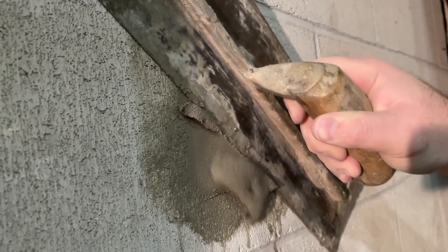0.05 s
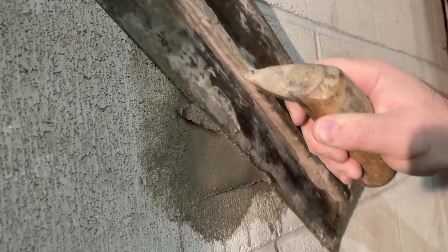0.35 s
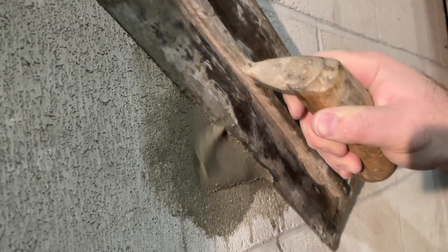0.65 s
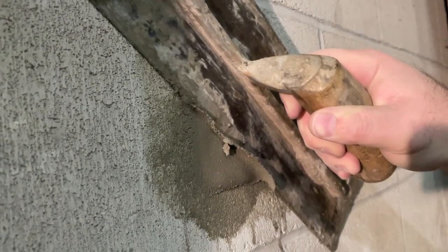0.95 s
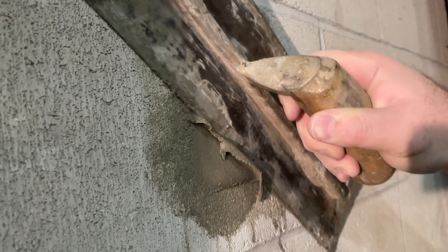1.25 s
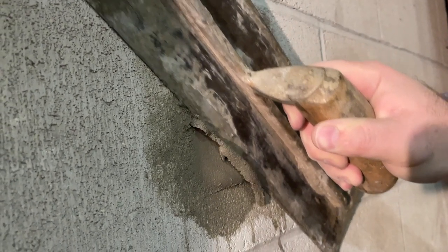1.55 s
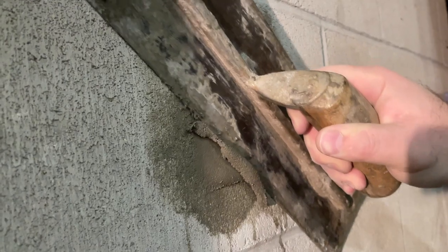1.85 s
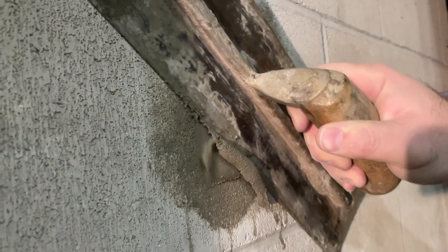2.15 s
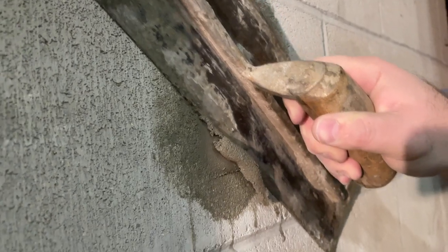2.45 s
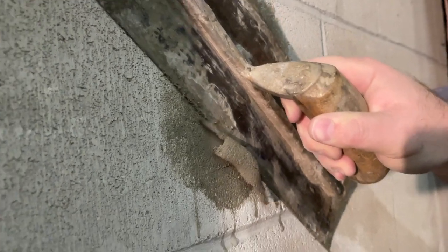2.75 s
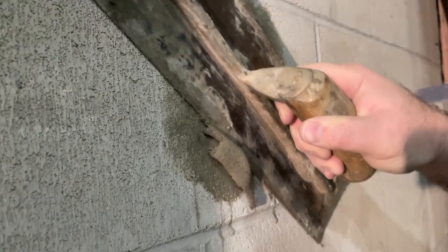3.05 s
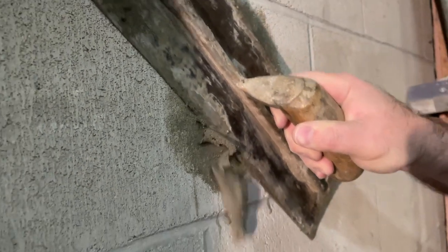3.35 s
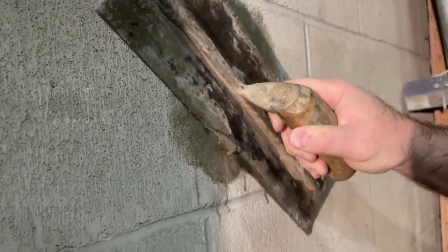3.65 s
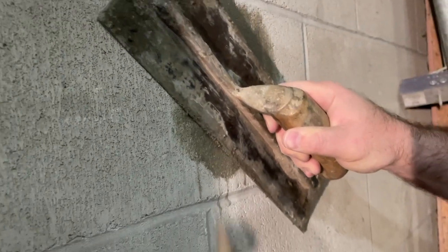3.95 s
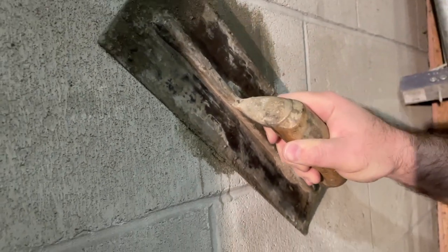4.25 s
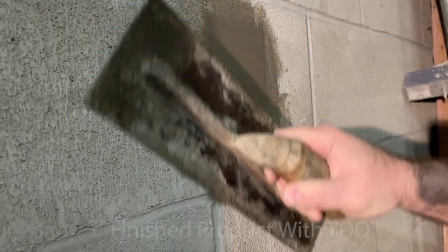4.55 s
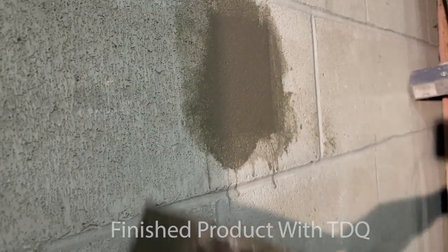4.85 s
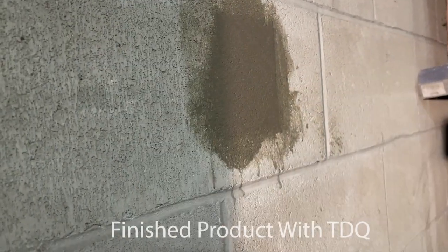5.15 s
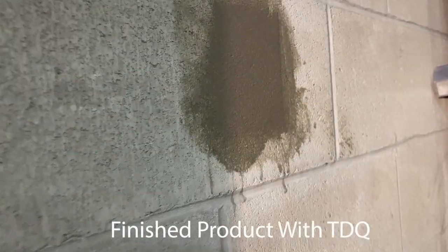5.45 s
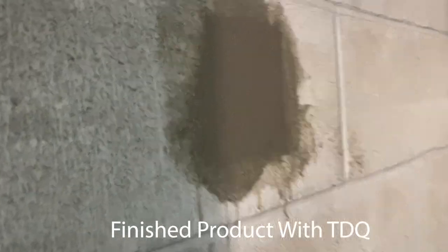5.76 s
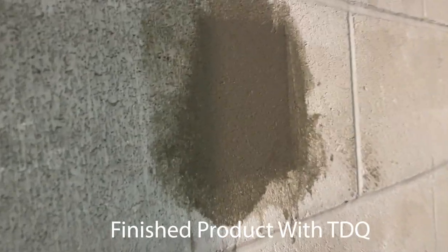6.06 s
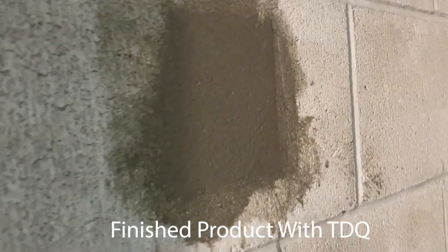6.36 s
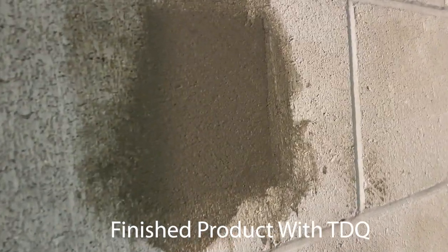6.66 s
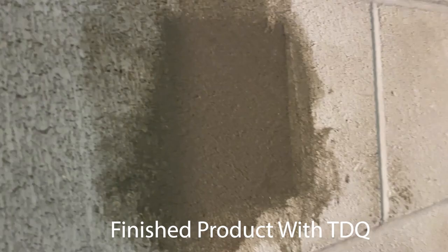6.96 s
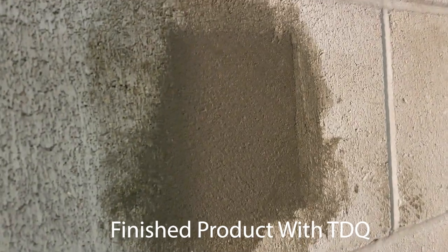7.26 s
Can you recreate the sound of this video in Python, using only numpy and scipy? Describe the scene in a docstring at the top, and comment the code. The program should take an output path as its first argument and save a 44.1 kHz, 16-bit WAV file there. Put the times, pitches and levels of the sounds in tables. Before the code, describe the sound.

Outdoors and close up, a metal trowel shaves sandy mortar from a wall in quick, even, short scrapes, with coarse grains crackling and ticking under the blade. After over four seconds the scraping ends in a longer stroke that thins and rises as the blade leaves. What is left is quiet: a low electric hum and the steady drone of a faraway engine.

```python
"""Trowel shaving mortar.

A steel trowel saws half-set mortar off a wall, close by, in about eight strokes a second. The scrape
dies at every turn, and the last stroke is a long sweep that lifts off. Stick-slip friction over sand
rings the hand-damped blade and hisses; coarse grit catches and clicks. Behind it a distant engine
pulls away, and a low electric hum and the outdoor air stay on once the trowel is lifted."""
import sys
import numpy as np
from scipy import signal
from scipy.fft import rfft, irfft, next_fast_len
from scipy.io import wavfile
from scipy.ndimage import uniform_filter1d

SR = 44100
rng = np.random.default_rng(int(sys.argv[2]) if len(sys.argv) > 2 else 0)


def unload_wav(signal):
    """Save mono or channel-first audio to the path in sys.argv[1] as 16-bit WAV at rate SR, clipped to [-1, 1]."""
    wavfile.write(
        sys.argv[1],
        SR,
        np.round(np.clip(np.atleast_2d(signal).T, -1, 1) * 32767).astype(np.int16),
    )


N = 327215
T = np.arange(N) / SR
FREQ = np.maximum(np.fft.rfftfreq(2 * next_fast_len(N // 2 + 8192), 1 / SR), 1)
TIP_S, LEAVES_S = 4.555, 4.715  # in the last sweep the blade tips onto a corner, then leaves the wall

# Strokes of the hand, each lasting until the next. Each row: start in seconds, relative levels of
# blade rasp and of sand hiss in dB, swell over the stroke in dB.
HAND_STROKES = [(-0.02, -20, -29, -19), (0.102, -21, -25.5, -11), (0.214, -19, -28.5, 13.5),
                (0.341, -22, -29, 4.5), (0.489, -21, -30.5, 13), (0.614, -23, -29.5, 1),
                (0.738, -23.5, -35, 3), (0.871, -20, -26, -8), (1.019, -23.5, -33, -1.5),
                (1.137, -21, -28, 1.5), (1.277, -16, -30.5, 6), (1.389, -24, -30, -12),
                (1.525, -20.5, -29, -3), (1.644, -22.5, -28.5, 0), (1.775, -22.5, -34, 25),
                (1.895, -23.5, -29.5, 10), (2.029, -21.5, -30.5, 12), (2.154, -23.5, -29, 0.5),
                (2.296, -23.5, -30.5, 3), (2.431, -21, -28, -8), (2.555, -22, -29, 4.5),
                (2.688, -20, -27.5, 8), (2.812, -21, -30, 9.5), (2.943, -23.5, -30, 3),
                (3.068, -20, -29, 8.5), (3.186, -23, -30, -2.5), (3.336, -21, -26.5, -6),
                (3.462, -21, -26.5, -4), (3.594, -24, -31.5, 9), (3.713, -22.5, -27, -5.5),
                (3.852, -23, -35.5, -6), (3.972, -24, -31.5, 2), (4.109, -21.5, -29.5, 18),
                (4.281, -21, -28, 3), (4.416, -16.5, -27.5, 9)]
# Modes of the steel plate. Each row: frequency at the usual grip in Hz, relative energy in dB,
# time to decay by 60 dB in seconds.
PLATE_MODES = [(778, -7, 0.056), (997, -4, 0.047), (1087.5, 1.5, 0.043), (1185, -10.5, 0.038),
               (1270, 1, 0.013), (1350, -17, 0.1), (1588, 2, 0.09), (1701, -1, 0.039), (1879, 0, 0.025),
               (1998, -5.5, 0.048), (2275, -8.5, 0.071), (2823, -11.5, 0.046), (3085, -7.5, 0.056)]


def trowel():
    """Friction noise: coarse grains drive the blade, fine ones hiss. Rows: common, left, right."""
    # The wall booms as the mortar thins. Each row: time in seconds, gain below 650 Hz in dB.
    wall_boom = [(0, -6), (.7, -11), (1.4, -9.5), (2.2, -0.5), (3.2, 0.5), (4.35, -3.5), (4.55, 0)]
    # Brightness of the sand. Each row: time in seconds, top treble relative to the rest in dB.
    fineness = [(0, 1), (1.0, -2), (2.2, 2), (2.7, 0), (3.4, 2.5), (4.5, 0.5), (4.65, -8)]
    _, blade_db, sand_db, swell_db = np.transpose(HAND_STROKES)
    on_blade = pressure(blade_db - 0.3, swell_db, attack_s=0.048, release_s=0.048, turn_db=-22.5)
    on_sand = pressure(sand_db + 1.95, swell_db, attack_s=0.046, release_s=0.048, turn_db=-24.5)
    first_touch = pressure(sand_db, swell_db * 0.27, attack_s=0.022, release_s=0.05, turn_db=-24)
    judder = stick_slip(per_s=110, fade_s=0.0032, steady=0.85) * undb(walk(350))
    coarse = np.array([grains(per_s=4500, spread_db=3.0) for _ in range(3)])
    fine = np.array([grains(per_s=18000, spread_db=3.5) for _ in range(3)]) + undb(-14.5) * coarse
    push, crack = catches(knock_db=10, crack_db=1.5, crumble_s=0.0023, shudder_db=-17, shudder_s=0.0087)
    grit_push, grit_crack = grit(on_blade, per_s=24, size_db=15, spread_db=5, crumble_s=0.0029)
    drag = even(coarse * judder, span_s=0.052) * on_blade
    drag += lows(drag, 650) * (undb(over_time(wall_boom)) - 1)
    drag[0] += push + grit_push
    rub = even(fine * judder * undb(2.1 * walk(500)), span_s=0.069) * on_sand
    rub = tilt(rub, over_time(fineness), pivot_hz=8300)
    _, sand_crackle = grit(first_touch, per_s=55, size_db=3.5, spread_db=4.5, crumble_s=0.0018)
    rub[0] += crack + undb(-18.5) * grit_crack + sand_crackle
    rasp = blade(drag, grip=1.24, wander=0.013, patchy_db=5, ring_db=-3.5)
    return rasp + lift_off(drag) + sand(rub, zing_db=-6, zing_t60=0.03)


def pressure(level_db, swell_db, attack_s, release_s, turn_db):
    """Amplitude envelope: friction noise follows the hand and sinks wherever it reverses."""
    starts, ends = stroke_spans()
    stroke = np.maximum(np.searchsorted(starts, T) - 1, 0)
    since, left = T - starts[stroke], ends[stroke] - T
    turning = np.clip(1 - since / attack_s, 0, 1) ** 2 + np.clip(1 - left / release_s, 0, 2) ** 2
    tipped = np.clip((T - TIP_S) / 0.032, 0, 1)
    swell = swell_db[stroke] * (since / (since + left) - .5) * (1 - tipped)
    db = level_db[stroke] + swell + turn_db * turning - 7 * tipped
    return uniform_filter1d(undb(db), size=200)


def stick_slip(per_s, fade_s, steady):
    """Stick-slip motion: the edge sticks, breaks free at once and relaxes, at uneven moments."""
    jumps = (rng.random(N) < per_s / SR) * rng.uniform(0.7, 0.78, N)
    return steady + ring(jumps, np.exp(-T[:SR // 20] / fade_s))


def grains(per_s, spread_db):
    """Shot noise: independent grain impacts, mostly small and a few large; rms 1."""
    size = undb(spread_db * np.minimum(rng.exponential(size=N), 3.5))
    return unit((rng.random(N) < per_s / SR) * size * rng.choice([-1, 1], N))


def catches(knock_db, crack_db, crumble_s, shudder_db, shudder_s):
    """Impulsive excitation: a coarse grain pushes the blade, cracks and leaves it shuddering."""
    # Grit caught under the edge. Each row: time in seconds, relative strength in dB, crack offset in dB.
    caught_grit = [(0.116, -20, -11), (0.149, -3, -26), (0.299, 0, -28), (0.376, -8.5, -8),
                   (0.506, -6, -12), (0.532, -1, -22), (0.631, -8, -9.5), (0.762, -16, -17),
                   (0.928, -1, -18), (0.938, 1.5, -14), (0.999, 2, -24), (1.026, -10.5, -11),
                   (1.142, -14, -10), (1.285, -9.5, -2), (1.326, -1, -27.5), (1.659, -15, -3.5),
                   (2.076, -7, -7), (2.587, -7, -17), (2.73, -5.5, -7), (2.741, -3, -8), (3.208, -12, -8),
                   (3.323, -6.5, -5), (3.479, -5, -13), (3.561, -5.5, -11), (3.721, -13, -14),
                   (3.742, -11.5, -1), (3.807, -0.5, -31), (3.819, -5.5, -6), (3.873, -3.5, -26),
                   (4.313, 3, -19), (4.376, -1.5, -28), (4.437, -5.5, -33)]
    push, crack, t = np.zeros(N), np.zeros(N), T[:SR // 16]
    for start, db, offset_db in caught_grit:
        bits, crumbs = rng.standard_normal((2, len(t)))
        i = int(start * SR)
        push[i] += undb(db + knock_db)
        push[i:i + len(t)] += undb(db + shudder_db) * crumbs * np.exp(-t / shudder_s)
        crack[i:i + len(t)] += undb(db + offset_db + crack_db) * bits * np.exp(-t / crumble_s)
    return push, crack


def grit(force, per_s, size_db, spread_db, crumble_s):
    """Brittle fracture: small grains snag at random, giving a push and a crack that scale with force."""
    push = (rng.random(N) < per_s / SR) * force * undb(size_db + spread_db * rng.uniform(-1, 1, N))
    crack = ring(push, np.exp(-T[:SR // 40] / crumble_s)) * rng.standard_normal(N)
    return push, crack


def blade(drives, grip, wander, patchy_db, ring_db):
    """Forced vibration: each stroke bends the blade anew, shifting and reweighting its resonances."""
    # Broad response of the blade on mortar. Each row: frequency at the usual grip in Hz, gain in dB.
    body_response = [(150, -38.5), (350, -24.5), (520, -18.5), (700, -14), (1000, -0.5), (1250, 1),
                     (1750, -2), (2300, -12.5), (2950, -14.5), (3400, -32.5), (6000, -41), (16000, -59)]
    # The rasp rises as less edge lies on the mortar. Each row: time in seconds, nominal centre in Hz.
    rasp_centre = [(0, 1415), (1.2, 1426), (3.2, 1444), (3.9, 1518), (4.2, 1610), (4.5, 1541)]
    usual_hz = 1447.3
    centres = over_time(rasp_centre, np.mean(stroke_spans(), axis=0))
    chances = rng.standard_normal((len(HAND_STROKES), len(PLATE_MODES) + 1))
    responses = []
    for centre, chance in zip(centres, chances):
        stretch = (centre / usual_hz) ** grip
        weights = undb(patchy_db * chance[1:]) * rng.choice([-1, 1], len(PLATE_MODES))
        response = undb(ring_db) * plate(stretch * (1 + wander * chance[0]), weights)
        body = minimum_phase([(hz * stretch, db) for hz, db in body_response])
        response[:len(body)] += body
        responses.append(response)
    return by_stroke(drives, responses)


def plate(stretch, weights):
    """Modal superposition: the plate's impulse response is a sum of damped sines; unit energy."""
    t = T[:SR // 10]
    response = np.zeros(len(t))
    for (hz, db, t60), weight in zip(PLATE_MODES, weights):
        envelope = weight * undb(db - 60 * t / t60) / np.sqrt(t60)
        response += envelope * np.sin(2 * np.pi * hz * stretch * t)
    return response / np.linalg.norm(response)


def sand(drives, zing_db, zing_t60):
    """Multiple reflection in the thin steel colours the sand's hiss differently on each stroke."""
    # Sand crushed under the edge. Each row: frequency in Hz, relative level in dB.
    crush_spectrum = [(600, -36.5), (2000, -1.5), (3400, -6), (4100, -1.5), (4750, 2), (5300, 2),
                      (5750, -1.5), (6400, -2.5), (7400, -3.5), (8600, -3), (10000, 2.5), (12500, -2),
                      (15800, -9)]
    hiss = minimum_phase(crush_spectrum)
    zings = [ring(hiss, undb(zing_db) * tail(zing_t60, delay_s=0.00026)[:SR // 20]) for _ in HAND_STROKES]
    return by_stroke(drives, [zing + np.pad(hiss, (0, len(zing) - len(hiss))) for zing in zings])


def lift_off(drag):
    """Shrinking contact: as the last stroke lifts, only a corner touches and its rasp is higher."""
    corner = shape(drag, band(hz=2600, width_hz=1000) ** 2)
    return corner * undb(16) * np.interp(T, [TIP_S, LEAVES_S], [0, 1])


def stereo_spread(rows):
    """The recorder's frequency-dependent phase and level differences spread the scrape between left
    and right; reflections from the yard add a short dull tail."""
    # The recorder's phase difference. Each row: frequency in Hz, lead of the left in radians.
    channel_phase = [(20, 0), (1000, .35), (1600, 1.0), (2000, -.3), (2950, 1.5), (3600, .4), (5000, .6),
                     (5750, -1.5), (6500, -.7), (7400, -2.7), (8550, -3.14), (10800, -4.5), (13200, -6.25),
                     (16000, -6.3)]
    # The recorder's balance. Each row: frequency in Hz, left minus right in dB.
    channel_balance = [(100, 5), (500, 2), (1200, 4), (2000, 3.5), (5000, 1), (8000, 1), (16000, -1)]
    # Scrape that each microphone port alone hears from other points of the long edge.
    # Each row: frequency in Hz, level relative to the common part in dB.
    edge_spread = [(300, 4), (600, -9), (1200, -7.5), (1900, 2), (2500, -1.5), (3600, 3), (6800, 3.5),
                   (8000, -19), (11500, 2.5), (14000, -20)]
    common, spread, channels = rows[0], undb(over_hz(edge_spread)), []
    for side, own in zip((1, -1), rows[1:]):
        direct = shape(common, np.exp(side * .5j * over_hz(channel_phase))) + shape(own, spread)
        echoes = ring(common, tail(t60=.33, delay_s=.005))
        yard = shape(echoes, undb(-15) / np.hypot(1, FREQ / 3500))
        balance = undb(side * over_hz(channel_balance) / 2)
        channels.append(shape(direct + yard, balance / np.hypot(1, spread)))
    return np.array(channels)


def engine():
    """Periodic firing makes an exhaust drone that rises and eases off; gears whine at a fixed ratio."""
    # The engine's run. Each row: time in seconds, firing rate in Hz, drone in dB, gear whine in dB.
    engine_run = [(0, 45, -30, -64), (.45, 47, -34.5, -84), (1.05, 53.5, -36.5, -77.5),
                  (1.4, 57.5, -38, -72), (2, 60.5, -43.5, -72), (2.501, 66.5, -40.5, -59),
                  (3.301, 72, -57, -53.5), (4, 71.3, -46, -54.5), (4.8, 67.8, -47.5, -56.5),
                  (5.6, 66, -40.5, -53.5), (6.297, 65, -39, -50.5), (7.42, 63, -36.5, -54.5)]
    times, *columns = np.transpose(engine_run)
    hz, drone_db, whine_db = (np.interp(T, times, column) for column in columns)
    phase = 2 * np.pi * np.cumsum(hz * (1 + 0.0031 * walk(7.4))) / SR
    drone = (np.sin(phase) + undb(-18) * np.sin(2 * phase)) * undb(drone_db + 0.76 * walk(11))
    whine = np.sin(3.81 * phase) * undb(whine_db + 1.3 * walk(9))
    return np.sqrt(2) * (drone + whine)


def hum():
    """A line spectrum: electric hum of fixed low tones, each wavering a little in level."""
    # Tones of the hum. Each row: frequency in Hz, rms level in dB.
    tones = [(59.3, -48), (118.5, -66), (177.6, -49.5), (345, -71.5), (441, -65.5)]
    return np.sqrt(2) * sum(undb(db + 1.94 * walk(5)) * np.sin(2 * np.pi * (hz * T + rng.random()))
                            for hz, db in tones)


def air():
    """Coherence falls with frequency: outdoor rumble is alike at both ports, thin hiss unlike."""
    # Outdoor noise. Each row: frequency in Hz, spectral density in dB per Hz.
    noise_floor = [(20, -101), (33, -88), (46, -61), (85, -59.5), (110, -70.5), (210, -71), (300, -78.5),
                   (380, -73), (520, -84.5), (1000, -89), (3000, -98.5), (9000, -105), (12500, -104),
                   (15500, -119)]
    # Narrow bands of hiss. Each row: centre in Hz, width in Hz, peak density in dB per Hz.
    hiss_bands = [(2080, 68, -89.5), (5100, 570, -97), (6210, 420, -84.5), (11700, 450, -101)]
    hiss_power = sum((undb(db) * band(hz, width)) ** 2 for hz, width, db in hiss_bands)
    colour = np.sqrt(undb(over_hz(noise_floor)) ** 2 + hiss_power)
    apart = 1.67 / np.hypot(1, 620 / FREQ)  # ratio of each port's own noise to the common noise
    common = afar(shape(rng.standard_normal(N), colour / np.hypot(1, apart)))
    own = shape(rng.standard_normal((2, N)), colour * apart / np.hypot(1, apart))
    return (common + own) * np.sqrt(SR / 2) * undb(0.61 * walk(6))


def stirs():
    """Band-limited noise swells and fades in the quiet: a rustle, a low bump, a hiss and a tick."""
    # Faint sounds. Each row: midpoint and half length in seconds, centre and width in Hz, level in dB.
    faint_sounds = [(6.28, .09, 11500, 3600, -67), (6.551, 0.094, 33, 9.8, -39),
                    (6.8, 0.68, 4720, 3800, -62), (7.124, 0.0045, 1500, 830, -54)]
    sound = np.zeros((2, N))
    for middle, half, hz, width, db in faint_sounds:
        noise = unit(shape(rng.standard_normal(N), band(hz, width) ** 2))
        sound += afar(noise * undb(db) * np.exp(-((T - middle) / half) ** 4))
    return sound


def afar(x, lag_s=0.000412, lean_db=-0.9):
    """Path difference: far sounds reach the left port first, and are slightly stronger on the right."""
    side = np.array([[1], [-1]])
    return shape(x, np.exp(1j * np.pi * side * FREQ * lag_s)) * undb(side * lean_db / 2)


def stroke_spans():
    """Start and end of every stroke, in seconds."""
    starts = np.array([row[0] for row in HAND_STROKES])
    return starts, np.append(starts[1:], LEAVES_S)


def by_stroke(drives, responses):
    """Overlap-add: each stroke's part of the drive sounds through its own unit-energy response."""
    out = np.zeros((len(drives), N + SR))
    turns = [0] + [int(SR * row[0]) for row in HAND_STROKES[1:]] + [N]
    for start, end, response in zip(turns, turns[1:], responses):
        sound = signal.fftconvolve(drives[:, start:end], response[None] / np.linalg.norm(response), axes=1)
        out[:, start:start + sound.shape[1]] += sound
    return out[:, :N]


def even(x, span_s):
    """Division by the running rms: the hand keeps its force steady, however the grains jump."""
    return x / np.sqrt(np.abs(uniform_filter1d(x ** 2, int(span_s * SR))) + 1e-9)


def minimum_phase(points, size=1024):
    """Folding the cepstrum gives a causal, unit-energy impulse response from (Hz, dB) points."""
    hz = np.maximum(np.fft.rfftfreq(size, 1 / SR), 1)
    cepstrum = irfft(over_hz(points, hz) * np.log(10) / 20)
    cepstrum[1:size // 2] *= 2
    cepstrum[size // 2 + 1:] = 0
    response = irfft(np.exp(rfft(cepstrum)))
    return response / np.linalg.norm(response)


def tail(t60, delay_s):
    """Reverberation: dense reflections decay exponentially; unit energy."""
    t = T[:SR // 2]
    response = rng.standard_normal(len(t)) * undb(-60 * t / t60) * (t > delay_s)
    return response / np.linalg.norm(response)


def ring(x, response):
    """Convolution with an impulse response."""
    return signal.fftconvolve(x, response)[:N]


def shape(x, gain):
    """Filtering by a gain given at every frequency."""
    return irfft(rfft(x, 2 * (len(FREQ) - 1)) * gain)[..., :N]


def lows(x, cutoff_hz):
    """Zero-phase low-pass filter."""
    return shape(x, 1 / (1 + (FREQ / cutoff_hz) ** 6))


def tilt(x, db, pivot_hz):
    """Shelving about a pivot: treble up and bass down by db in all."""
    low = lows(x, pivot_hz)
    return (x - low) * undb(db / 2) + low * undb(-db / 2)


def band(hz, width_hz):
    """A Lorentzian band, gain 1 at its centre."""
    return 1 / (1 + ((FREQ - hz) / width_hz * 1.3) ** 2)


def walk(per_s):
    """Random values joined by straight lines; rms 1."""
    return unit(np.interp(T * per_s, np.arange(N // 8), rng.standard_normal(N // 8)))


def over_hz(points, f=FREQ):
    """Interpolation of (Hz, value) points on a log-frequency axis."""
    hz, value = np.transpose(points)
    return np.interp(np.log(f), np.log(hz), value)


def over_time(points, t=T):
    """Linear interpolation of (seconds, value) points."""
    return np.interp(t, *np.transpose(points))


def undb(db):
    """Decibels to gain."""
    return 10 ** (np.asarray(db) / 20)


def unit(x):
    """Scaling to rms 1."""
    return x / np.sqrt(np.mean(x ** 2))


def scene():
    """Superposition: the trowel in front; air, faint stirs, engine and hum behind it."""
    return stereo_spread(trowel()) + air() + stirs() + afar(engine() + hum())


def record(dry):
    """Soft saturation rounds the highest peaks, and a steep low-pass cuts the top treble."""
    low_pass = signal.ellip(10, .2, 80, 15850, fs=SR, output="sos")
    return signal.sosfilt(low_pass, np.tanh(0.73 * dry) / 0.68)


dry = scene()
out = record(dry)
unload_wav(out)
```